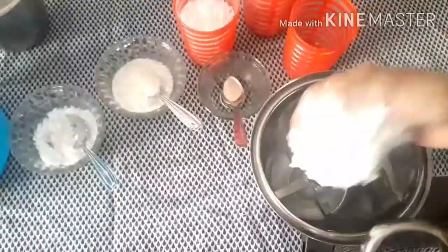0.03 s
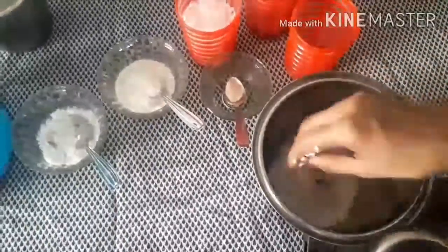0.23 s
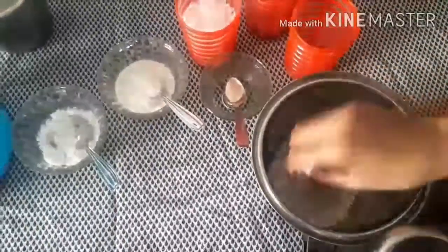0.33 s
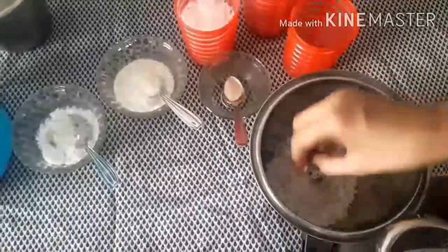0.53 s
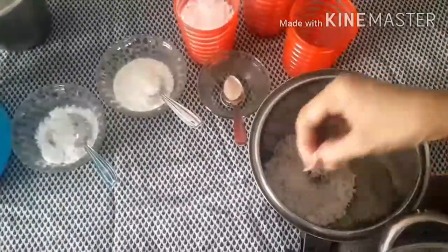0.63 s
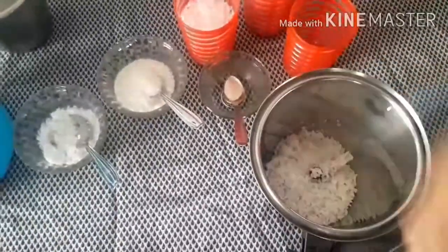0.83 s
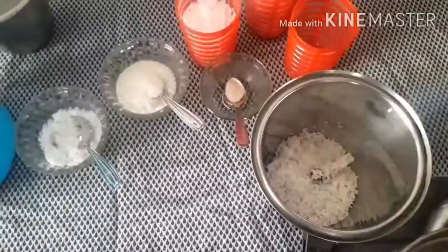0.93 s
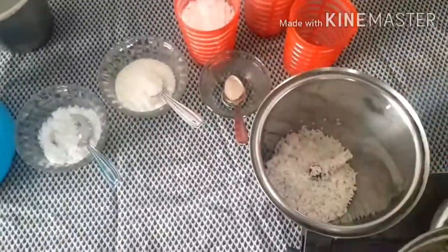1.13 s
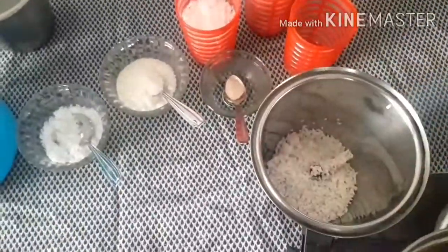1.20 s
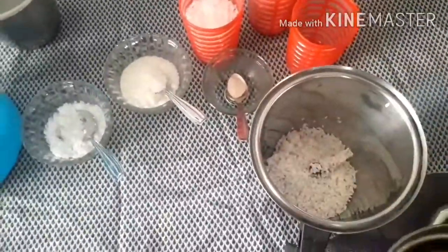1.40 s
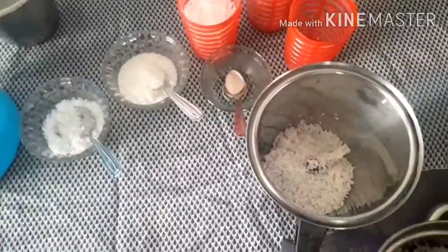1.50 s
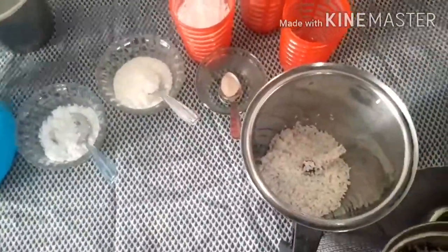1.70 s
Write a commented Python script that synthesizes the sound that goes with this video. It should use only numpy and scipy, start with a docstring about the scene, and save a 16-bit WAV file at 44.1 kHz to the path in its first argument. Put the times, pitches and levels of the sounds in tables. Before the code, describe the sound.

Small dry grains fall into a steel jar with a bright clatter and a soft thud, and stragglers tick after. Then a hand rustles among grains and slides a container, close by in a quiet kitchen.

```python
"""Small dry grains drop into a steel mixer jar on a cloth-covered kitchen counter.
Each impact is an impulse that clicks and excites the modes of the steel; stragglers clatter after.
The landing mass rocks the jar with a soft thud and stirs the air resonance inside it.
Then a hand rustles among more grains and slides a container with friction, over quiet room noise."""
import sys
import numpy as np
from scipy import signal
from scipy.fft import rfft, irfft
from scipy.io import wavfile

SR = 44100
rng = np.random.default_rng(int(sys.argv[2]) if len(sys.argv) > 2 else 0)


def unload_wav(signal):
    """Save mono or channel-first audio to the path in sys.argv[1] as 16-bit WAV at rate SR, clipped to [-1, 1]."""
    wavfile.write(
        sys.argv[1],
        SR,
        np.round(np.clip(np.atleast_2d(signal).T, -1, 1) * 32767).astype(np.int16),
    )


N = 77175
T = np.arange(N) / SR


def amp(db):
    """Decibels to amplitude ratio."""
    return 10 ** (np.asarray(db) / 20)


def unit_energy(x):
    """Normalisation to an energy of one."""
    return x / np.sqrt(np.sum(x ** 2) + 1e-20)


def unit_rms(x):
    """Normalisation to an rms of one."""
    return unit_energy(x) * np.sqrt(len(x))


def through(x, response):
    """Convolution with an impulse response."""
    return signal.fftconvolve(x, response)[:N]


def colour(spectrum, size=4096):
    """Minimum-phase response of unit energy with the given spectral shape."""
    hz, db = np.transpose(spectrum)
    log_hz = np.log(abs(np.fft.fftfreq(size, 1 / SR)) + 1)
    log_gain = np.log(amp(np.interp(log_hz, np.log(hz), db)))
    transfer = np.exp(signal.hilbert(log_gain).conj())
    return unit_energy(np.fft.ifft(transfer).real[:size // 2])


def decay(t60_s):
    """Exponential damping: 60 dB down after t60_s."""
    return np.exp(-np.log(1000) * T / t60_s)


def tail(t60_s):
    """Diffuse response: overlapping modes or echoes merge into decaying noise."""
    return unit_energy(rng.standard_normal(N // 4) * decay(t60_s)[:N // 4])


def swell(peak_s, rise_s, fall_s, level_db):
    """Envelope with a Gaussian rise and an exponential fall."""
    exponent = np.where(T < peak_s, -((T - peak_s) / rise_s) ** 2, (peak_s - T) / fall_s)
    return amp(level_db) * np.exp(exponent.clip(-40, 0))


def clicks(per_s, spread_db):
    """Poisson impulses: many small contacts, a few large."""
    size = amp(spread_db * np.minimum(rng.exponential(1, N), 4))
    return unit_rms(size * rng.choice([-1, 1], N) * (rng.random(N) < per_s / SR))


def crossover(low, high, split_hz=8620):
    """Complementary filters: the low band of one signal joins the treble of another."""
    highpass = signal.butter(3, split_hz, "high", fs=SR, output="sos")
    return low + signal.sosfiltfilt(highpass, high - low + 1e-12)


def stream(rows, contacts):
    """Amplitude modulation: contacts swell and fade once per row, each with its own treble gain."""
    envelopes = np.array([swell(*row[:-1]) for row in rows])
    treble = amp([row[-1] for row in rows])
    return crossover(contacts * envelopes.sum(0), contacts * (treble @ envelopes))


def rattle(rows):
    """Rebound: each hit spreads its energy over a dying burst of small bounces."""
    start_s, energy_db, rattle_s, treble_db = np.transpose(rows)[:, :, None]
    envelopes = (T >= start_s) * np.exp(-np.minimum(abs(T - start_s) / rattle_s, 20))
    hits = envelopes * clicks(per_s=14000, spread_db=1.8)
    hits = hits * amp(energy_db) * np.sqrt((envelopes ** 2).sum(1) / (hits ** 2).sum(1))[:, None]
    return crossover(hits.sum(0), (amp(treble_db) * hits).sum(0))


# spectral density of the room noise: frequency_hz, relative_db
ROOM_SPECTRUM = [(25, -23), (55, -17.5), (80, -7.5), (120, 2), (170, -3.5), (320, -0.5), (600, -8),
                 (1200, -12.5), (2500, -17), (4500, -19.5), (7400, -23.5), (8300, -43), (14500, -32),
                 (15500, -26.5)]
def room(level_db=-52.5):
    """Stationary noise: the steady, mostly low background of the kitchen."""
    noise = irfft(rfft(rng.standard_normal(N)) * rfft(colour(ROOM_SPECTRUM), N), N)
    return amp(level_db) * unit_rms(noise)


# resonance of the sliding container: time_s, pitch_hz, level_db
SLIDE_PATH = [(1.549, 937, -79), (1.644, 1040, -50), (1.681, 1200, -45), (1.704, 1197, -47.5),
              (1.731, 1229, -40.5), (1.75, 1243, -43)]
# spectrum of its friction: frequency_hz, relative_db
FRICTION_SPECTRUM = [(100, -10), (600, -10), (1000, -3.5), (1500, -4), (2200, -2.5), (2600, 3),
                     (3300, -3.5), (3700, 6), (4500, -28), (8000, -22), (15000, -49)]
def slide(half_width_hz=41):
    """Sliding friction: broadband noise grows while one narrow resonance climbs in pitch."""
    time_s, pitch_hz, level_db = np.transpose(SLIDE_PATH)
    lowpass = signal.butter(2, half_width_hz, fs=SR, output="sos")
    baseband = signal.sosfilt(lowpass, rng.standard_normal(N) + 1j * rng.standard_normal(N))
    carrier = np.exp(2j * np.pi * np.cumsum(np.interp(T, time_s, pitch_hz)) / SR)
    envelope = amp(np.interp(T, time_s, level_db)) * (T > time_s[0])
    friction = rng.standard_normal(N) * swell(1.93, 0.3578, -8.5, -40)  # peaks after the scene ends
    return unit_rms((baseband * carrier).real) * envelope + through(friction, colour(FRICTION_SPECTRUM))


def crackle(per_s=3000, spread_db=3.5, pitches=12, ring_s=0.00042, ring_gain=.6):
    """Impulse excitation: plain clicks mix with heavily damped husk rings of many pitches."""
    t = np.arange(160) / SR
    rings = sum(through(clicks(per_s / pitches, spread_db), np.exp(-t / ring_s) * np.sin(2 * np.pi * hz * t))
                for hz in np.linspace(2390, 8700, pitches))
    return unit_rms(ring_gain * unit_rms(rings) + clicks(per_s, spread_db))


# hand movements among the grains: peak_s, rise_s, fall_s, level_db, treble_db
HAND_MOVES = [(.16, 0.015, 0.022, -51.5, -21), (1.025, 0.034, 0.026, -42.5, 1),
              (1.085, 0.023, 0.052, -34, 1), (1.30, 0.068, 0.14, -52.5, -3), (1.482, 0.038, 0.11, -37, -10),
              (1.68, 0.069, 0.089, -43.5, -5)]
# spectrum of the rustle: frequency_hz, relative_db
RUSTLE_SPECTRUM = [(100, -29.5), (600, -9.5), (1300, -15), (2200, -10), (3200, -5), (4400, -0.5), (6700, 1),
                   (7600, -1), (8400, -11), (10800, -4.5), (15500, -17.5)]
# light ticks as the hand handles things beside the jar: start_s, level_db, rattle_s, treble_db
HAND_TICKS = [(.9705, -45.5, 0.006, 3), (.9904, -29.5, 0.0067, 5.5), (.999, -40, 0.013, 9),
              (1.0543, -38, .002, -2), (1.0672, -38, 0.0041, -8), (1.2244, -41, 0.0029, -10),
              (1.2418, -36, .001, -3), (1.307, -27, 0.0046, 0.5), (1.3375, -42, 0.00078, -2),
              (1.3488, -38, 0.0021, 11), (1.363, -41.5, 0.0028, 16), (1.3675, -37.5, 0.0058, 9.5),
              (1.386, -43, 0.03, 2), (1.4385, -37, 0.0025, -1), (1.4765, -8, 0.00037, -16),
              (1.4815, -19, 0.0011, -24), (1.4915, -24, 0.00084, -10), (1.5015, -25, 0.0009, -20),
              (1.528, -24, 0.0011, -14), (1.543, -22.5, 0.00059, -3), (1.6115, -32, 0.0039, -19)]
# spectrum of a tick: frequency_hz, relative_db
TICK_SPECTRUM = [(100, -42), (2500, -32), (3300, -15), (4100, 1), (5300, -3), (7300, 3), (8400, -5),
                 (10800, -6), (15500, -18)]
# steel modes excited by the ticks: pitch_hz, gain_db, t60_s
PING_MODES = [(4095, -29, .1), (5420, -7, 0.14), (6920, -21, .18), (7700, -29.5, 0.11)]
def rustle(reverb_db=-7, reverb_t60_s=0.23):
    """Granular contact noise: grains crackle under the hand, and sharper ticks ping the steel."""
    ticks = rattle(HAND_TICKS)
    ping = sum(amp(db) * unit_energy(np.sin(2 * np.pi * hz * T) * decay(t60_s))
               for hz, db, t60_s in PING_MODES)
    grains = through(stream(HAND_MOVES, crackle()), colour(RUSTLE_SPECTRUM))
    direct = grains + through(ticks, colour(TICK_SPECTRUM)) + through(ticks, ping)
    return direct + amp(reverb_db) * through(direct, tail(reverb_t60_s))


# air in the jar stirred by the grains: peak_s, rise_s, fall_s, level_db
AIR_SWELLS = [(.192, 0.017, 0.053, -39), (.222, 0.019, 0.053, -43), (1.076, .02, 0.015, -49.5)]
# response of the jar's cavity: frequency_hz, relative_db
CAVITY_SPECTRUM = [(60, -37), (170, -9.5), (350, -14), (450, -7), (545, 4.5), (600, -0.5), (690, -22),
                   (760, -7), (1000, -33), (3000, -29)]
def cavity():
    """Cavity resonance: the jar filters the noise of stirred air into a hollow sound."""
    air = rng.standard_normal(N) * sum(swell(*row) for row in AIR_SWELLS)
    return through(air, colour(CAVITY_SPECTRUM))


# the jar rocking on the counter: pitch_hz, level_db, t60_s
ROCKING_MODES = [(91, -40, 0.65), (103.4, -45, 0.38)]
def thud(start_s=.206, rise_s=.014):
    """Beating: the landing mass rocks the jar in two damped modes of nearby frequency."""
    t = np.maximum(T - start_s, 0)
    modes = sum(amp(db) * np.exp(-np.log(1000) * t / t60_s) * np.sin(2 * np.pi * hz * (t - 2 * rise_s))
                for hz, db, t60_s in ROCKING_MODES)
    return modes * (1 - np.exp(-t / rise_s))


# the jar's clearest modes: pitch_hz, pour_coupling_db, strike_coupling_db, t60_s
STEEL_MODES = [(1635, -33, -34, .6), (1695, -32, -30, .5), (2658, -31, -31, .5), (2783, -23, -33, .65),
               (2855, -29, -35, .3), (3893, -13, -22, .33), (3931, -22, -14, .24), (4073, -24, -13, .26),
               (4106, -25, -15, .3), (4535, -22, -24, .3), (4660, -28, -18, .2), (5140, -24, -16, .26),
               (5347, -20, -17, .2), (5545, -23, -15, .2), (5675, -24, -14, .2), (5830, -16, -14, .25),
               (5912, -23, -13, .2), (6059, -24, -12, .2), (6247, -23, -12, .2), (6356, -23, -10, .22),
               (6817, -25, -15, .2), (7053, -20, -15, .2), (7243, -18, -21, .25), (7392, -18, -20, .25),
               (7615, -22, -16, .27), (9690, -19, -26, .2), (10975, -18, -24, .2), (11720, -16, -25, .22),
               (12400, -17, -25, .2), (13673, -13, -22, .2), (13973, -17, -19, .2), (14669, -17, -26, .2)]
def steel(pour, strike):
    """Modal energy balance: each mode gains energy from the contacts and loses it by damping."""
    ring = 0
    for hz, pour_db, strike_db, t60_s in STEEL_MODES:
        retained = np.exp(-2 * np.log(1000) / (t60_s * SR))
        power = (amp(pour_db) * pour) ** 2 + (amp(strike_db) * strike) ** 2
        energy = signal.lfilter([1 - retained], [1, -retained], power)
        ring = ring + np.sqrt(2 * energy) * np.sin(2 * np.pi * (hz * T + rng.random()))
    return ring


# grains pouring in: peak_s, rise_s, fall_s, level_db, treble_db
GRAIN_POURS = [(.189, 0.0067, 0.024, -26, -26), (.223, 0.015, 0.03, -20, 2), (.295, .02, 0.018, -42.5, -12)]
# spectrum of poured grains on steel: frequency_hz, relative_db
POUR_SPECTRUM = [(100, -38), (900, -29), (2100, -21.5), (3300, -14.5), (3900, -1.5), (4600, -8.5),
                 (5500, 0), (6400, -1.5), (7600, 2), (8300, -9), (9500, -3.5), (11000, 2), (13800, 0.5),
                 (15500, -9.5)]
# grains and small clumps striking the wall: start_s, level_db, rattle_s, treble_db
WALL_STRIKES = [(.1725, -28.5, 0.0029, -11), (.2098, -9, 0.0013, -16), (.321, -33.5, 0.0082, -4),
                (.3525, -37, 0.0024, -14), (.3605, -28, 0.011, -4.5), (.3665, -30, .006, -5),
                (.3852, -23.5, 0.011, -6), (.437, -12.5, 0.007, -13), (.4435, -16.5, 0.011, -4.5),
                (.458, -20, 0.015, -12), (.5135, -19.5, 0.0053, -8.5), (.680, -28, 0.0056, -4)]
# spectrum of a wall strike: frequency_hz, relative_db
STRIKE_SPECTRUM = [(100, -39), (900, -33), (2200, -28.5), (3300, -22), (3900, 0.5), (4700, -8), (5500, -2),
                   (6400, -0.5), (7600, 0), (8300, -11), (9500, -7), (11000, -3), (13800, -2.5),
                   (15500, -5)]
def falling_grains(pour_ring_db=0.5, strike_ring_db=-2.5, echo_db=-0.5, shimmer_db=-6.5):
    """Impact excitation: each contact ticks, echoes in the jar and rings the steel."""
    pour = stream(GRAIN_POURS, clicks(per_s=9000, spread_db=2.4))
    strike = rattle(WALL_STRIKES)
    sound = steel(amp(pour_ring_db) * pour, amp(strike_ring_db) * strike)
    for force, spectrum in ((pour, POUR_SPECTRUM), (strike, STRIKE_SPECTRUM)):
        ticks = through(force, colour(spectrum))
        shimmer = crossover(tail(t60_s=0.47), tail(t60_s=0.4))  # dense modes and room; treble dies first
        echoes = tail(t60_s=0.018)
        sound = sound + ticks + through(ticks, amp(echo_db) * echoes + amp(shimmer_db) * shimmer)
    return sound


def scene():
    """Superposition: all sources add at one close point."""
    return (falling_grains() + thud() + cavity() + rustle() + slide() + room())[None]


def record(dry, cutoff_hz=15520):
    """Band limiting by a linear-phase low-pass filter."""
    lowpass = signal.firwin(401, cutoff_hz, window=("kaiser", 8), fs=SR)
    return signal.oaconvolve(dry, lowpass[None], "same")


dry = scene()
out = record(dry)
unload_wav(out)
```